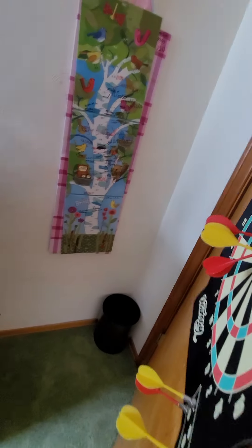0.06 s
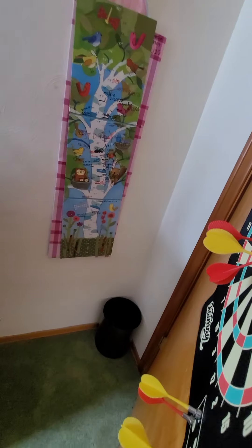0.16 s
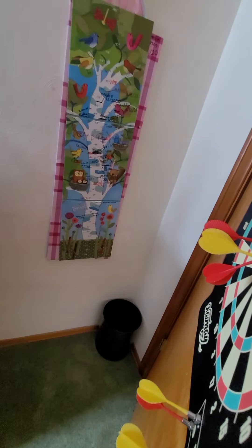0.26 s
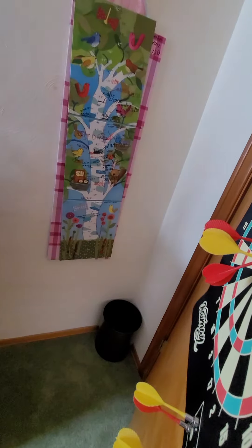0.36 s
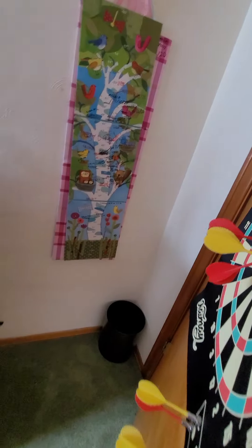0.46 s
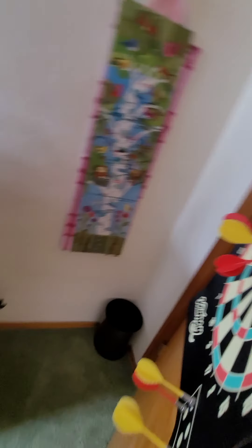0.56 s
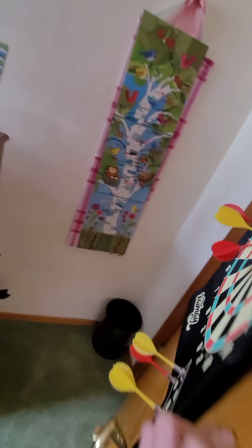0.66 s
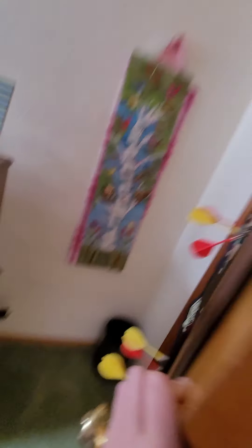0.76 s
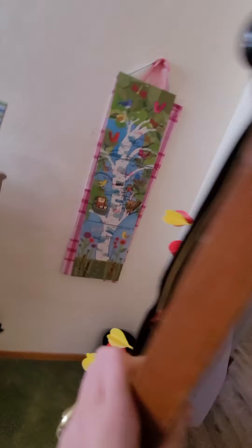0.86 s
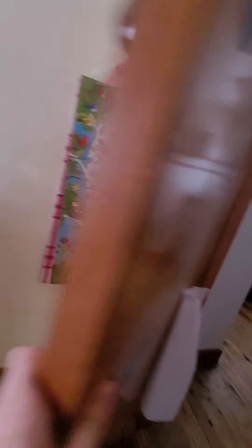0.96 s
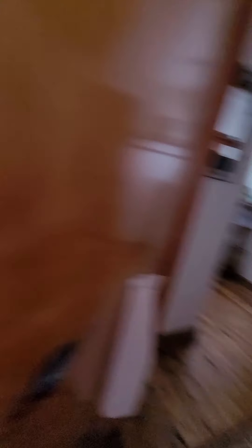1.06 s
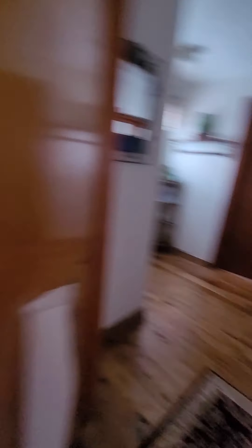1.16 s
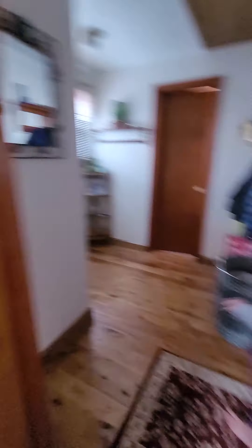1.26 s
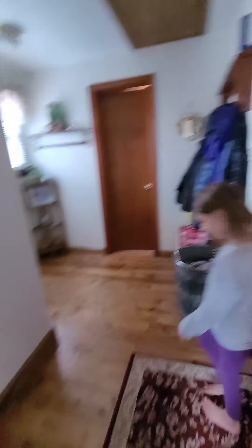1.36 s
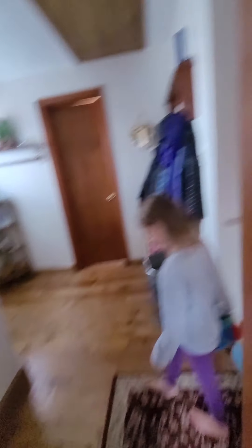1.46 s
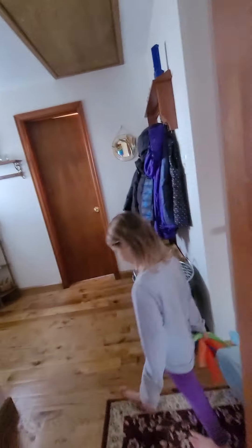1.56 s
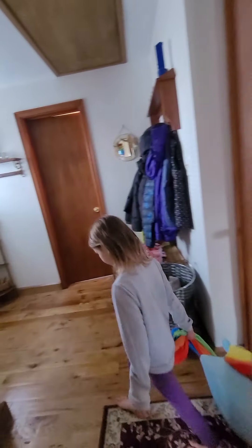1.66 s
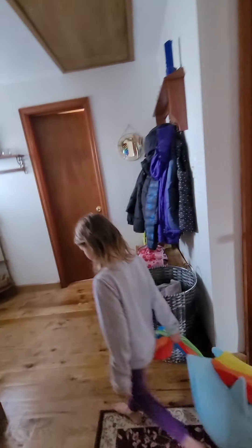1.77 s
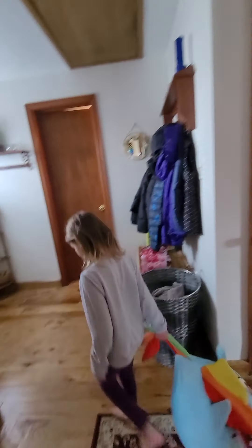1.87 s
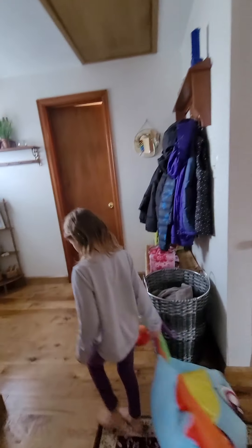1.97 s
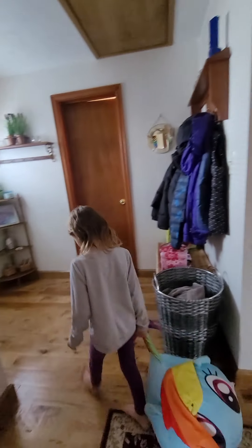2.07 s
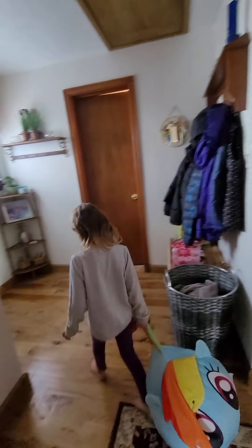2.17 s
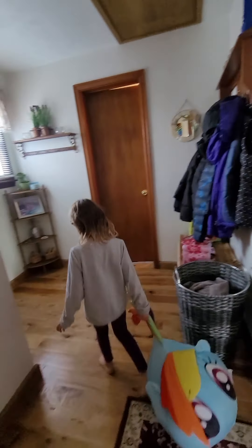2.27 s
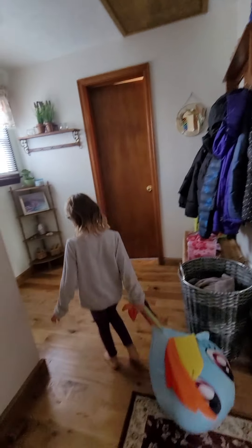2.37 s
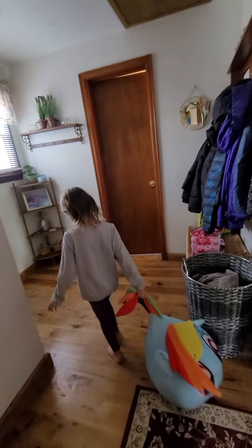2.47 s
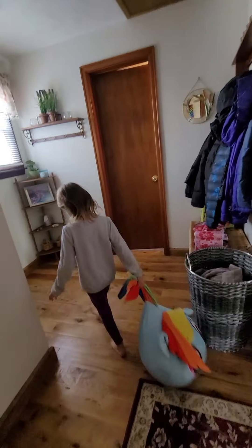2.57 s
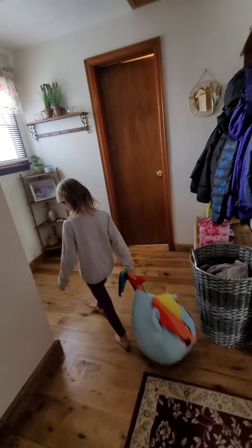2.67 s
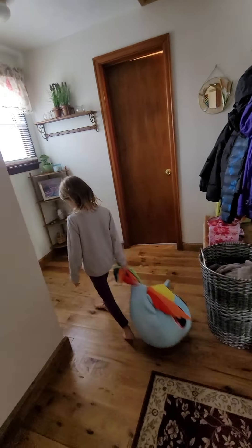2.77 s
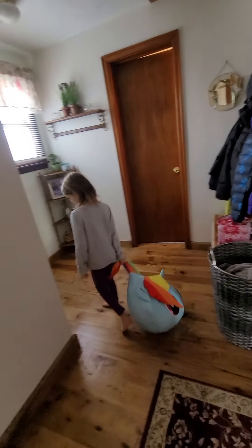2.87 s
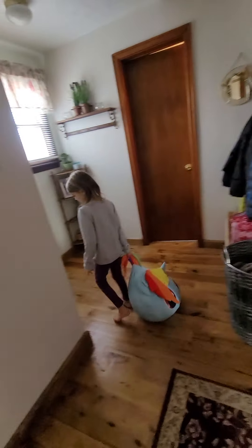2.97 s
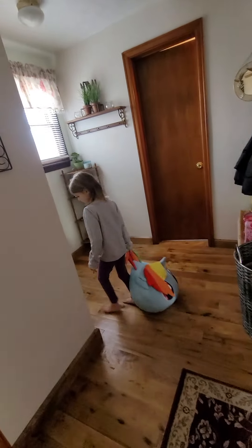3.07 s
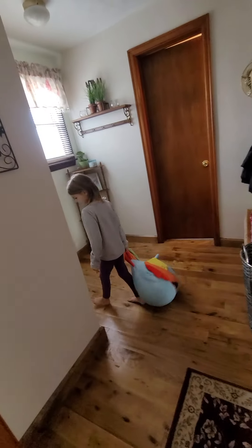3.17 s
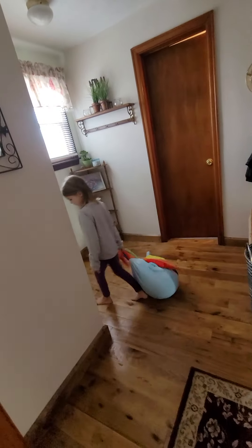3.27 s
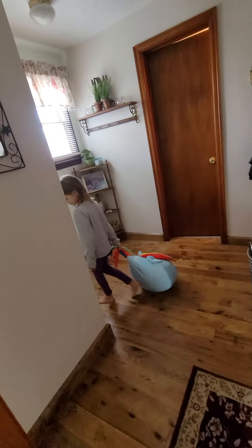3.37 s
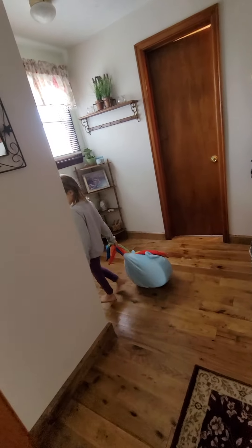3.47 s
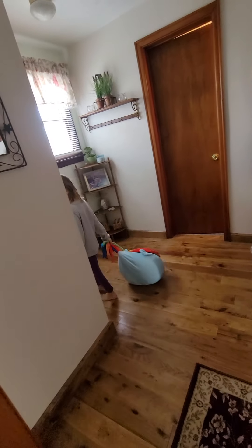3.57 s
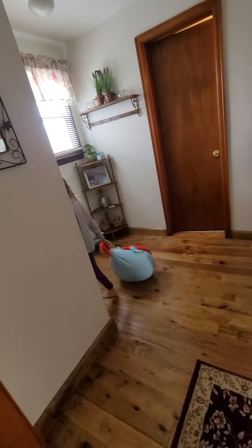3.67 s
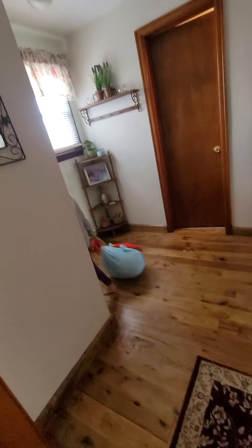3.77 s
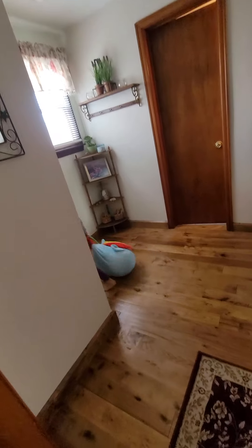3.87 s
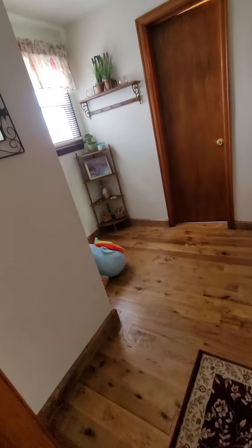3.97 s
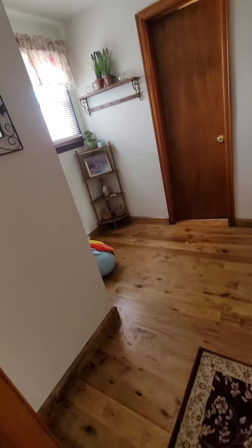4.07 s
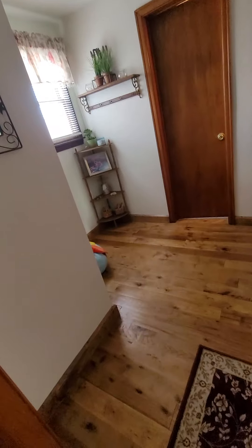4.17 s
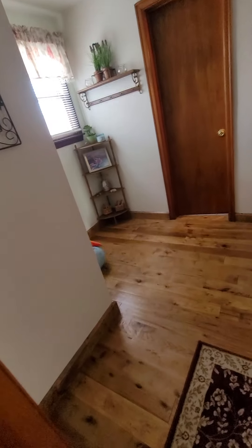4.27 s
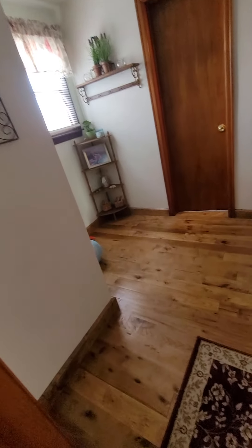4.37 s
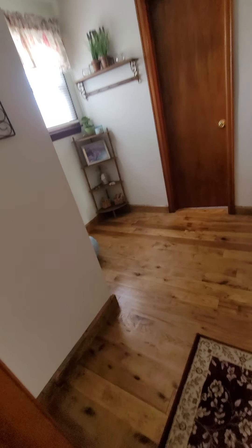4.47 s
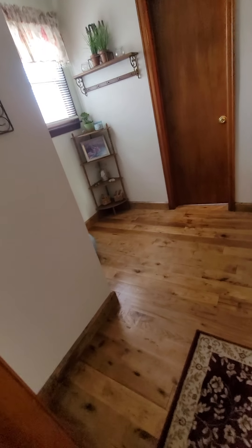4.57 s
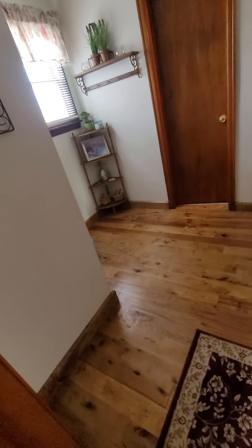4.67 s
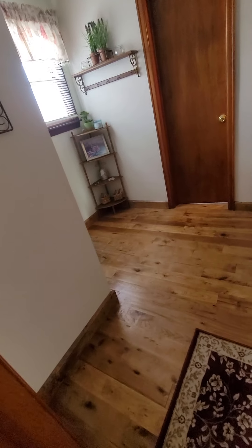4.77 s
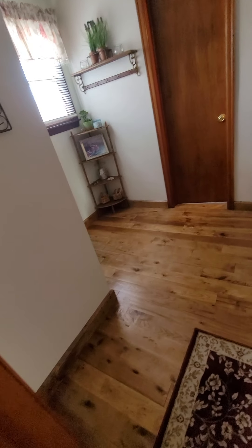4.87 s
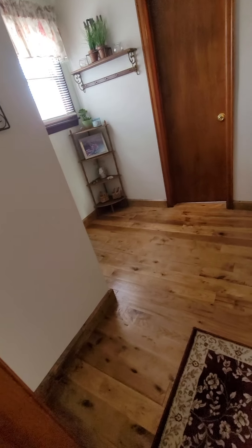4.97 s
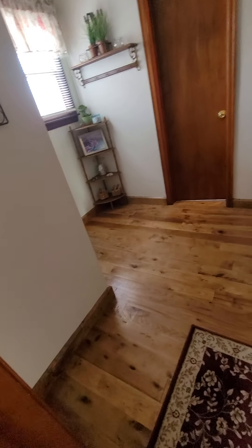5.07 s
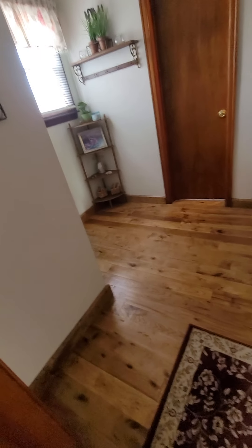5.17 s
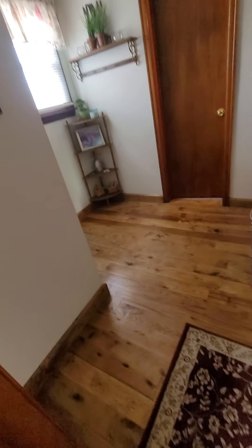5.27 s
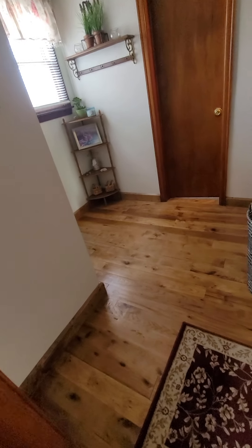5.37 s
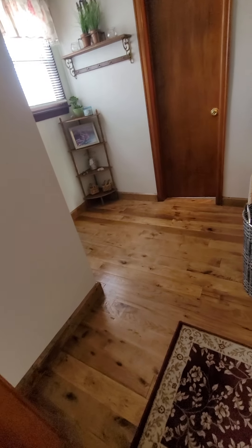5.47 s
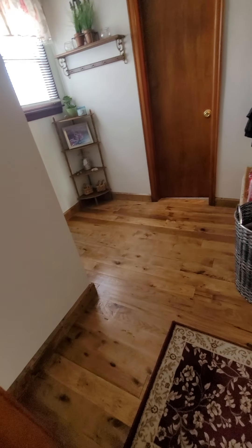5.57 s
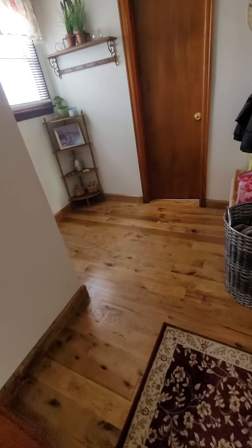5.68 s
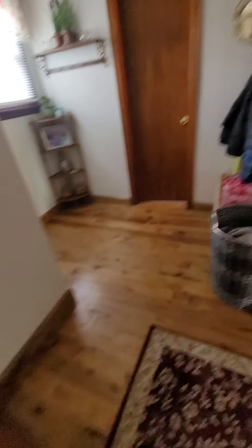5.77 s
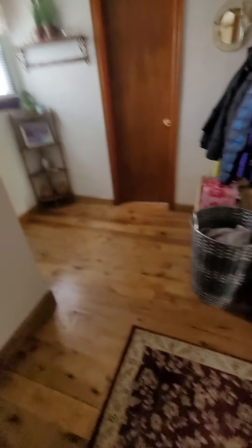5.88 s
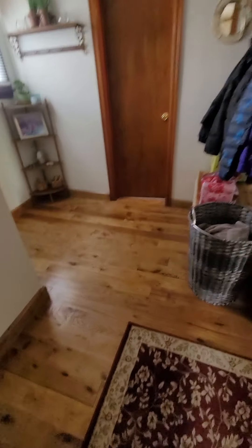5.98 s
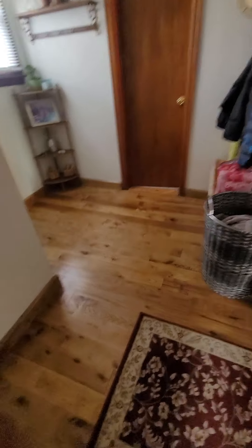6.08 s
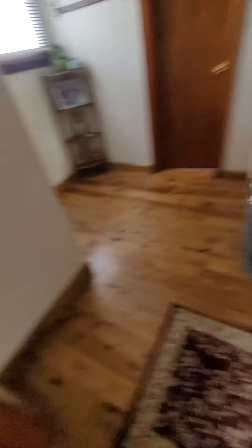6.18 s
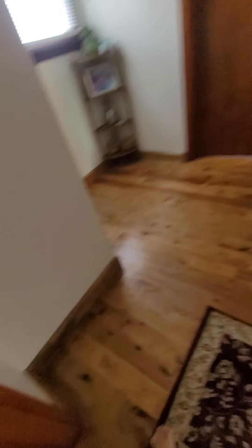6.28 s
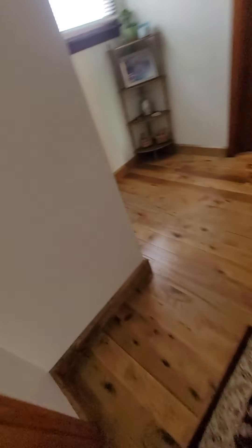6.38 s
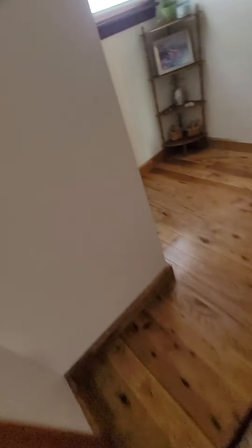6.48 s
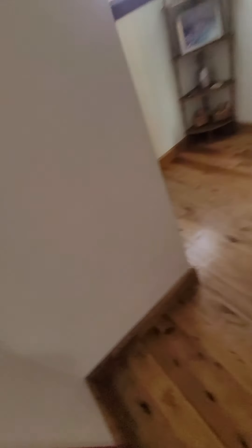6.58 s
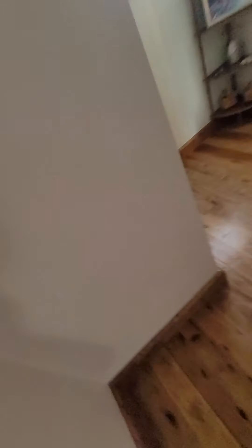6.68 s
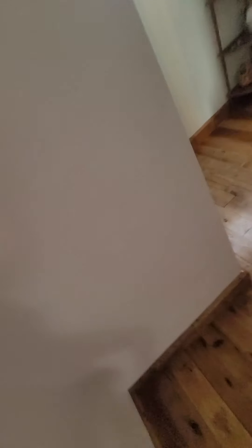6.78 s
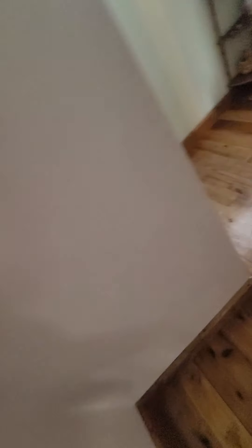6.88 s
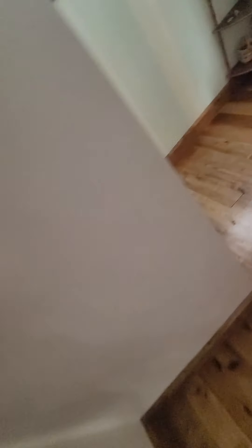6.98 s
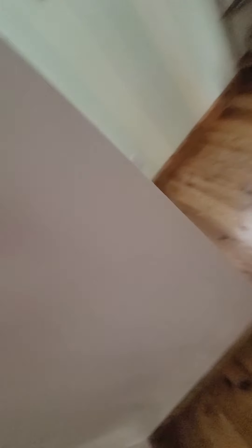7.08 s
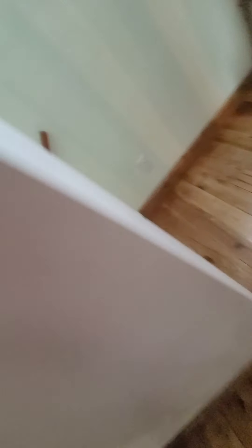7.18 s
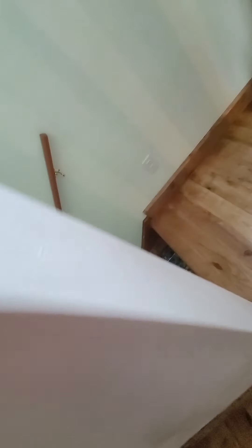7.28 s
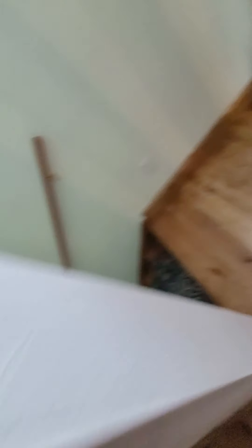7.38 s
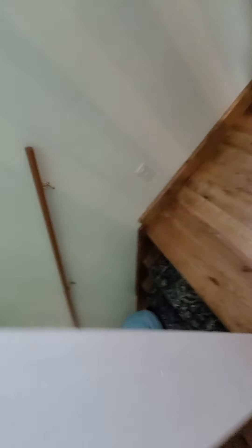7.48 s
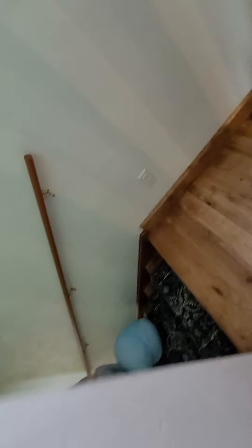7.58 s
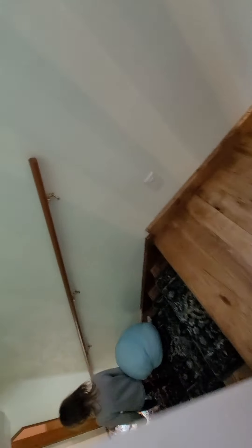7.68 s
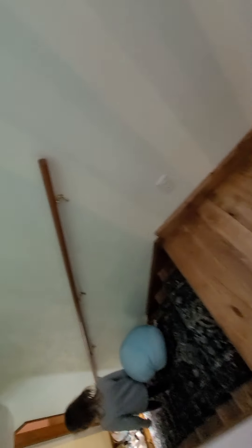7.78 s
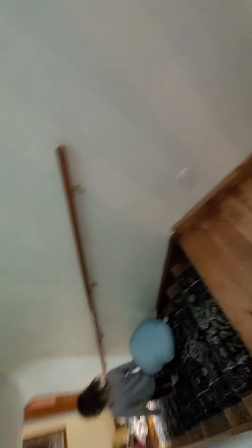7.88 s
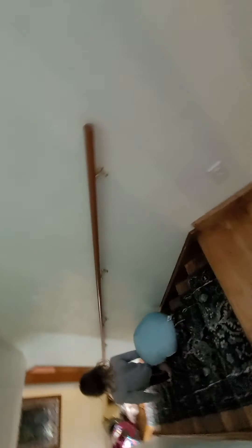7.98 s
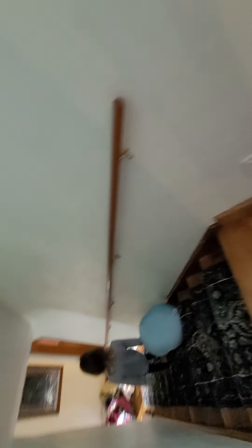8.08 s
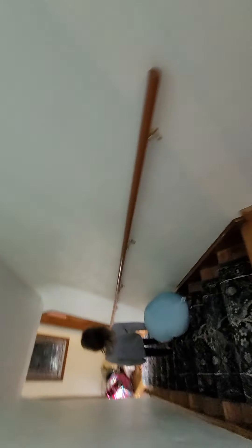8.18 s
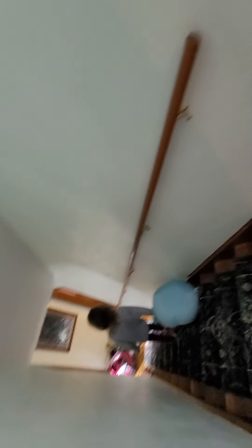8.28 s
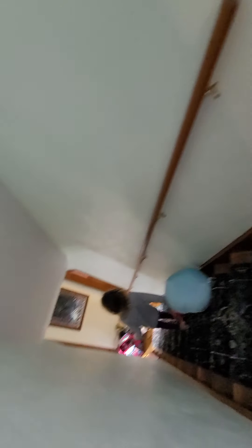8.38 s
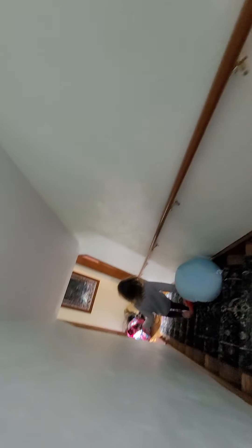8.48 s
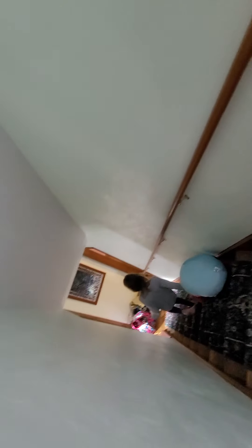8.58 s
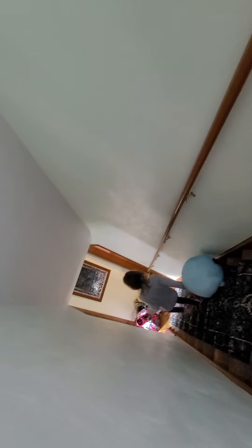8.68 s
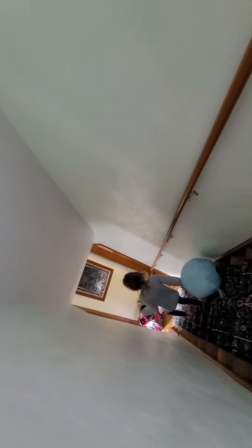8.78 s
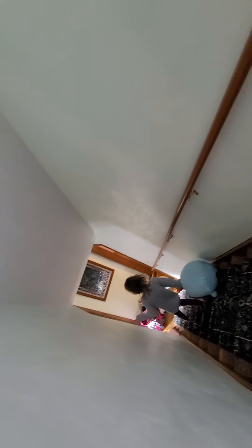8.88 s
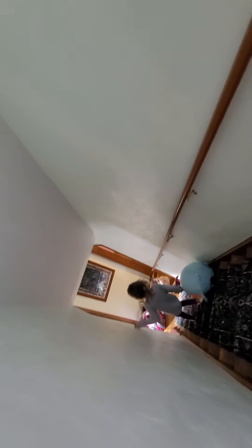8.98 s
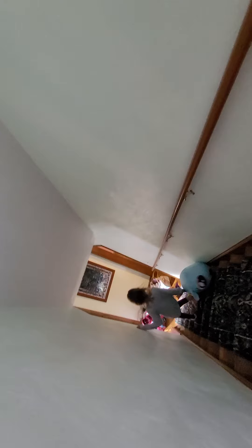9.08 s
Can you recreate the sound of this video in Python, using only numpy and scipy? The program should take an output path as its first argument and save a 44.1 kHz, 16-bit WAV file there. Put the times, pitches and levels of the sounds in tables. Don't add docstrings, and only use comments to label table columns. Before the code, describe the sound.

One loud door knock, soft barefoot thuds, faint cloth hiss, then sharp board cracks and dull uneven steps on an indoor wooden staircase.

```python
import sys
import numpy as np
from scipy import signal
from scipy.fft import rfft, irfft, next_fast_len
from scipy.io import wavfile
from scipy.ndimage import uniform_filter1d

SR = 44100
rng = np.random.default_rng(int(sys.argv[2]) if len(sys.argv) > 2 else 0)


def boost(x):
    u = np.asarray(x, float) / 20
    return 10 ** u


def output_pcm(signal):
    pcm = np.clip(np.atleast_2d(signal).T, -1, 1) * 32767
    wavfile.write(sys.argv[1], SR, np.round(pcm).astype(np.int16))


N = 403074

# t/s, bass lag/ms, treble lag/ms, bass level/dB, treble level/dB
BEARING = [(.024, -.5, -.23, 4, 2), (.35, -.48, -.29, 5, 0), (.7, .48, .45, -3, -2), (1.3, .54, .5, -1, -3),
           (2.16, .5, .39, -7, -4), (3.5, .41, .39, -7, -2), (4.1, -.11, -.02, -1, -1),
           (4.8, -.14, -.035, -3, 3), (5.13, -.18, -.035, -1.5, 4), (5.32, -.09, -.02, -3, 1),
           (5.67, -.08, .02, -1, 0), (5.86, -.09, -.02, -5, 1), (6.06, -.23, -.035, -4, 3),
           (6.43, -.05, .07, -8, -2), (6.87, .58, .2, -8.5, -3), (7.08, .6, .25, -11, -3),
           (7.5, .52, .25, -12, -5), (7.75, .6, .26, -12, -4), (7.93, .45, .25, -12, -3),
           (8.03, .2, .2, -6, -3), (8.41, .52, .2, -12, -4), (8.6, -.3, -.34, -6, 0),
           (9.1, -.42, -.3, -2, 0)]
BODY_HZ = 1502
UNSHADED_HZ = 200
TRAVEL_S = .001
# f/Hz, correlation [-1 to 1]
LIKENESS = [(60, 0.88), (130, 0.74), (290, 0.23), (640, -0.58), (1410, -0.51), (3100, 0.0079),
            (6820, -0.011), (15000, -0.27)]
# f/Hz, t60/s, level/dB
HALL_OCTAVES = [(180, 0.42, 0.5), (318, 0.25, 4.5), (692, 0.23, 4), (1415, 0.18, 7.5), (3000, 0.2, 3),
                (5930, 0.24, -1.5), (11000, 0.13, -3.5)]

# f/Hz, level/dB per Hz
RUMBLE_SPECTRUM = [(12, -56.5), (20, -19.5), (54, 0.5), (70, 4), (102, -11.5), (173, -5.5), (260, -31.5),
                   (340, -49)]
# t/s, level/dB
JOSTLE = [(0, -62), (1.9, -61.5), (2.6, -67.5), (3.7, -71.5), (5.0, -67), (7.85, -68.5), (8.4, -61),
          (9.14, -69)]
AFTERSHAKE_DB, AFTERSHAKE_T60_S = -27, 1.15
# f/Hz, level/dB per Hz
AIR_SPECTRUM = [(88, -42.5), (160, -10.5), (240, -3.5), (395, 1), (605, -3), (823, -11.5), (1280, -8),
                (5600, -30)]
# t/s, level/dB
STIR = [(0.0, -54.5), (0.43, -67), (1.45, -60.5), (2.11, -69), (2.4, -63), (3.05, -67.5), (3.8, -68.5),
        (4.07, -61.5), (4.27, -69.5), (5.78, -64.5), (6.8, -67), (7.03, -57.5), (7.59, -64.5),
        (7.89, -59.5), (8.5, -66), (9.14, -59.5)]
# f/Hz, level/dB per Hz
CLOTH_SPECTRUM = [(1470, -45.5), (2500, -7.5), (2740, -5), (2980, -11), (4010, -2.5), (7220, -6),
                  (8480, -3.5), (15500, -7)]
# t/s, length/s, end level/dB
PULLS = [(0.575, 0.57, -74.5), (1.28, 0.14, -71.5), (1.412, 0.47, -62.5), (2.566, 0.27, -71.5),
         (2.733, 0.2, -63), (2.933, 0.18, -62), (4.379, 0.4, -66.5), (6.081, 0.15, -67.5),
         (6.614, 0.3, -76), (6.864, 0.26, -70.5), (7.146, 0.48, -81), (7.73, 0.24, -69),
         (7.92, 0.13, -67.5), (8.26, 0.098, -66), (9.106, 0.056, -66.5)]
# t/s, length/s, start level/dB
BRUSHES = [(3.115, 0.4, -71), (3.532, 0.74, -69), (4.17, 0.2, -71.5), (5.684, 0.075, -72),
           (6.44, 0.12, -72), (8.105, 0.1, -61), (8.38, 0.21, -68.5), (8.602, 0.17, -68.5)]
PULL_SWELL_DB, BRUSH_FADE_DB = 5.5, 7
# t/s, rms level/dB, low f/Hz, high f/Hz, t60/s
SLAPS = [(.022, -36, 294, 1000, 0.25), (0.023, -39, 1300, 3000, 0.11), (0.674, -64.5, 586, 2600, 1),
         (0.777, -39, 445, 4770, 0.15), (1.263, -41, 785, 2390, 0.12), (1.261, -51, 3400, 4900, 0.16),
         (2.155, -53.5, 197, 1730, 0.27), (4.842, -42.5, 375, 5800, 0.14), (5.323, -49, 1940, 16000, 0.073),
         (7.084, -49.5, 496, 9000, 0.095), (7.93, -65.5, 497, 5000, 0.93), (6.864, -46, 300, 6000, .12),
         (5.655, -58, 500, 3000, .2)]
# t/s, rms level/dB, low f/Hz, high f/Hz, t60/s
SLIDES = [(1.36, -56, 290, 3030, 0.37), (2.731, -54, 283, 3520, 0.25), (3.318, -59, 300, 785, 0.19),
          (4.722, -57, 115, 260, 1.6), (6.11, -67.5, 2440, 7000, 0.4), (6.439, -65.5, 306, 6400, 0.86),
          (6.779, -58, 2020, 5970, 0.2), (6.888, -41.5, 306, 4200, 0.15), (8.595, -40.5, 246, 5500, 0.22),
          (8.89, -58.5, 203, 588, 1.1), (9.077, -36.5, 241, 340, 0.33), (6.125, -67, 5400, 6300, 0.47),
          (6.14, -66.5, 2800, 3400, 0.35), (6.45, -66, 5400, 6200, .4), (6.47, -65.5, 2820, 3400, 0.32),
          (3.86, -73, 900, 3000, 2.5), (4.06, -75, 1180, 1350, .9)]
SLAP_RISE_S, SLIDE_RISE_S = .0035, 0.016
# t/s, peak level/dB
DOOR_HIT = [
    (0.0234, -7),
]
# f/Hz, level/dB, t60/s
DOOR_MODES = [(372, -13, 0.28), (511, -19.5, 0.27), (600, -1.5, 0.3), (640, -4.5, 0.073), (953, -4, 0.096),
              (1233, -15.5, 0.15), (1850, -24, 0.096), (1900, -37, 0.12), (2530, -23.5, 0.035),
              (3050, -29, 0.32)]
# t after contact/s, strength [ratio]
DOOR_BLOWS = [(.0025, 2.1), (.0062, .9), (.0165, 0.7), (.025, 0.53), (.04, 0.43), (.049, 0.31)]
# t/s, peak level/dB, f/Hz,
# width/octaves
CLICKS = [(.175, -63, 2200, 1.5), (.197, -60, 13000, .6), (.208, -52, 2300, 1.9), (.557, -40, 13100, 0.73),
          (.557, -56, 5000, 1.6), (0.783, -43, 5000, .6), (0.788, -47, 5000, .6), (2.047, -53, 2770, 1.6),
          (4.1773, -39, 5800, 0.5), (4.191, -52, 4500, 1.8), (4.1965, -36, 11500, 0.79),
          (4.2032, -40, 8450, 0.36), (4.8018, -27, 1700, .8), (5.1277, -25, 4420, 0.83),
          (5.1274, -22, 1140, 1.03), (5.1393, -36, 1000, 0.87), (5.3208, -30, 1430, 0.64),
          (5.6662, -26, 2000, 0.46), (5.8562, -42, 1300, 0.58), (6.0566, -32.5, 1900, 0.83),
          (1.263, -44, 3770, 0.58), (.7752, -33, 2520, 0.6), (.7822, -43, 3330, 0.24),
          (7.515, -39.5, 760, 0.46), (6.4375, -42, 1220, 0.96), (3.417, -52, 2400, 0.6),
          (.0235, -44, 4490, .9), (5.128, -27, 14500, 0.4), (5.139, -40, 13100, 0.49),
          (5.3213, -22.5, 3060, 0.92), (5.321, -35, 6050, 0.18), (5.3282, -27.5, 2420, 1.4),
          (5.329, -29, 12400, .3), (5.6662, -23, 2630, 0.73), (6.0571, -27, 2420, 0.7),
          (6.574, -54, 2950, .6), (6.778, -54.5, 4090, 0.73), (6.8622, -39, 5540, 0.4),
          (6.885, -40, 5640, 0.28), (7.007, -55, 2780, 1.5), (7.5157, -39, 2300, 0.54),
          (7.543, -44, 2300, 0.44), (7.732, -48, 2870, 0.37), (7.788, -50, 2780, 0.52),
          (7.928, -45, 3120, 0.44), (8.109, -47, 10000, .9), (8.602, -48, 2570, .8),
          (4.1768, -44, 11500, .8), (4.8015, -38, 14500, .4), (4.82, -55, 13000, .4),
         (4.845, -50, 8000, 1.5), (5.267, -58, 8000, 1.5), (5.3235, -38, 13000, .2),
         (5.326, -38, 12500, .2), (5.6668, -23.5, 2400, .9), (6.575, -58, 9000, 1.5),
         (7.7606, -45, 3000, 0.44), (8.41, -46, 2600, .6), (8.41, -49, 7200, .4), (1.263, -42, 4200, 0.46),
         (4.2036, -48, 7000, 2.0), (4.1768, -52, 2500, 1.2), (8.72, -58, 11000, .9), (7.0, -58, 7000, 1.5)]
# t/s, peak level/dB, joist f/Hz, tread overtone level/dB
FLOOR_STEPS = [(0.026, -40.5, 84.7, -18), (0.259, -48.5, 84.7, -12.5), (0.42, -54, 79.8, -10.5),
               (0.674, -47, 76.3, -13), (0.768, -42.5, 61.4, -19), (0.976, -61, 129.6, 0.5),
               (1.18, -40, 69.6, -28), (1.297, -42, 65.3, -18), (1.39, -35, 54.5, -19),
               (1.602, -49.5, 69.5, -9), (2.2562, -17, 89, -19), (2.302, -34, 75, -20),
               (2.419, -54, 74, -36), (2.657, -62, 80, 5.5), (2.793, -36, 108, -14.5),
               (2.807, -29.5, 70, -38), (2.932, -49.5, 58.4, -27), (3.311, -29, 67, -37),
               (3.398, -46, 69.3, -36)]
# t/s, peak level/dB, stringer f/Hz, tread overtone level/dB
STAIR_STEPS = [(5.2, -44, 77.4, -10), (5.26, -43.5, 50.8, -4), (5.717, -32, 54, -6.5),
               (5.739, -34.5, 96.7, -14), (5.791, -33.5, 42.3, -22), (6.24, -48.5, 130.7, -2.5),
               (6.268, -40.5, 67.2, -7), (6.314, -25.5, 46, -32), (6.37, -34, 58, -26),
               (6.84, -49, 131.8, 3.5), (6.899, -29.5, 121, -7), (6.908, -15.5, 96.5, -17),
               (6.942, -24, 89.4, -18), (6.98, -28, 50.8, -35), (7.03, -37.5, 70.2, -19.5),
               (7.463, -47, 57.8, 3.5), (7.512, -29, 50.4, -5), (7.571, -35.5, 42.8, -22),
               (8.013, -42.5, 61.4, 2.5), (8.089, -39, 52.9, -14), (8.131, -48, 51.2, 0.5),
               (8.435, -48.5, 50.7, -21), (8.556, -27.5, 60, -8), (8.588, -25, 60, -11),
               (8.605, -19, 60.8, -10), (8.638, -26, 58, -4), (8.718, -34.5, 43.1, -9.5),
               (8.788, -42.5, 70.7, -25), (8.89, -48.5, 43.7, -1), (9.084, -33.5, 112.4, -2.5)]
FIRM_DB = -25
STEP_T60_S, STEP_T60_S_PER_DB = 0.21, 0.002
LOAD_S, LOAD_CYCLES = .006, .4
# t/s, level/dB, start f/Hz, end f/Hz, length/s
SQUEAKS = [(0.677, -53, 1430, 1340, 0.05), (0.678, -61, 770, 777, 0.098), (1.34, -65.5, 1900, 1810, 0.11),
           (4.834, -38, 5230, 5150, 0.003), (5.665, -22, 840, 1600, 0.0155),
           (6.594, -52.5, 1410, 1400, 0.0091), (2.297, -47, 497, 487, 0.027),
           (6.925, -36.5, 180, 170, 0.064), (0.135, -75, 3880, 4180, .125), (0.27, -77, 4400, 3800, 0.065),
           (6.866, -42.5, 195, 180, 0.028), (6.9, -26.5, 188, 164, 0.023),
           (8.574, -34.5, 196.6, 204, 0.029), (8.605, -36, 420, 422, 0.024),
           (8.625, -29.5, 125, 145, 0.032), (8.665, -45, 157, 147, .025), (7.044, -53, 1340, 1360, 0.019)]
# t/s, peak level/dB, ring f/Hz, crack level/dB, tick level/dB
HALL_KNOCKS = [(0.3455, -42, 476, -38, -43), (0.616, -51, 530, -12, -27), (0.7745, -22.5, 1300, -23, -50),
               (0.781, -23, 1300, -29, -35), (0.791, -35.5, 1740, -27, -16), (0.976, -46.5, 463, -10, -23),
               (1.2617, -24, 1080, -33, -58), (1.268, -41, 950, -23, -49), (1.389, -54, 350, -4, -9),
               (1.624, -49.5, 268, -8, -10), (1.871, -49, 351, -21, -18), (2.049, -59.5, 490, 1, -3),
               (2.155, -36.5, 330, -36, -41), (2.298, -50, 477, -32, -33), (2.379, -56, 332, -17, -6),
               (2.592, -53, 372, -5, -19), (3.417, -44.5, 489, -14.5, -41), (4.176, -55, 537, -8, -8),
               (4.191, -52, 540, -21, -20)]
# t/s, peak level/dB, ring f/Hz, crack level/dB, tick level/dB
TOP_TREADS = [(4.8007, -21.5, 480, -3, -30), (4.833, -43, 497, -9, -25), (5.127, -12, 575, -17.5, -37.5),
              (5.1336, -20, 336, -19, -40), (5.139, -19.5, 640, -23, -27), (5.264, -46, 203, -20, -35),
              (5.320, -30, 527, 0.5, -2.5), (5.324, -41, 465, 2, -2), (5.6658, -18.5, 640, -23, -29.5),
              (5.855, -35, 450, -8, -16), (6.056, -20, 500, -14.5, -29.5)]
# t/s, peak level/dB, ring f/Hz, crack level/dB
STAIR_KNOCKS = [(6.4332, -44, 700, 6), (6.4362, -43, 700, 8), (6.4378, -39, 520, -6), (6.596, -55, 330, -3),
                (6.8616, -21, 585, -17), (6.8845, -23, 560, -12), (7.047, -48, 1370, -9),
                (7.081, -40, 700, 4), (7.514, -36, 268, -4), (7.526, -33.5, 263, -26),
                (7.544, -52, 243, -4), (7.73, -32, 384, -10.5), (7.739, -29, 283, -24),
                (7.76, -39, 407, -1), (7.926, -41, 600, -1.5), (7.934, -42, 820, -13),
                (8.01, -44.5, 245, -12), (8.409, -38.5, 511, -7.5), (8.553, -45.5, 397, -26),
                (8.892, -43, 272, -35), (9.084, -45, 270, -32)]
TREAD_TICK_DB, TICK_FOLLOWS = -12, 0.63
FIRM_ROOM_DB, ROOM_PER_DB = -11, 0.4925
CARPET_DB = 3
CRACK_HZ, TICK_HZ = (950, 5370), (5400, 18100)
NOSING_HZ, NOSING_SHARE = (2300, 3550), 0.98
SNAP_OVER_GRIT, CRACK_WET, SWING_RISE_CYCLES = 10.3, 0.8, 0.47
# f/Hz, level/dB per Hz
HISS_SPECTRUM = [(1470, -33), (2500, -1), (3000, -7), (3270, -8.5), (4270, -9), (5490, -20.5), (9370, -12),
                 (15500, -24.5)]
HISS_DB, TOP_HZ = -76.5, 15800


def rms_one(x):
    return x / np.sqrt(np.mean(x ** 2) + 1e-20)


def at_hz(points, hz):
    table_hz, values = np.array(points)[:, :2].T
    return np.interp(np.log(hz), np.log(table_hz), values)


def in_time(rows):
    s, *columns = np.transpose(rows)
    return [np.interp(np.arange(N) / SR, s, c) for c in columns]


def band(x, low_hz, high_hz):
    sos = signal.butter(2, [low_hz, min(high_hz, SR * .45)], "band", fs=SR, output="sos")
    return signal.sosfilt(sos, x)


def fade(t, t60):
    return boost(-60 * t / max(t60, .002))


def drift(rate):
    r = np.exp(-80 * np.pi * rate / SR)
    white = rng.standard_normal(N // 40 + 2002)
    slow = signal.lfilter([1], [1, -2 * r, r * r], white)[2000:]
    return np.interp(np.arange(N) / 40, np.arange(len(slow)), rms_one(slow))


def add(out, s, sound):
    i = round((s - TRAVEL_S) * SR)
    out[:, i:i + sound.shape[1]] += sound[:, :N - i]


def ports(x, s, share=1):
    times, *columns = np.transpose(BEARING)
    bass_ms, treble_ms, bass_db, treble_db = (np.interp(s, times, c) for c in columns)
    size = next_fast_len(len(x) + SR // 100)
    hz = np.arange(size // 2 + 1) * SR / size
    bass = 1 / (1 + (hz / BODY_HZ) ** 4)
    lag_s = share * (treble_ms + (bass_ms - treble_ms) * bass) / 1000
    shadow = hz ** 2 / (hz ** 2 + UNSHADED_HZ ** 2)
    pan_db = (treble_db + (bass_db - treble_db) * bass) * shadow
    side = np.array([[1], [-1]])
    delay_s = TRAVEL_S + np.maximum(side * lag_s, 0)
    path = boost(side * pan_db / 2) * np.exp(-2j * np.pi * hz * delay_s)
    return irfft(rfft(x, size) * path, size)[:, :len(x)]


def hall_reply():
    t = np.arange(SR // 2) / SR
    white = rng.standard_normal((2, len(t)))
    reply = 0
    for hz, t60, level_db in HALL_OCTAVES:
        octave = band(white, hz / np.sqrt(2), hz * np.sqrt(2))
        reply = reply + boost(level_db) * octave * fade(t, t60)
    reply = reply * (1 - fade(t, 0.0061))
    return reply[:, :SR // 4] / np.sqrt(np.sum(reply ** 2) / 2)


def in_hall(x, s, room_db, reply):
    wet = boost(room_db) * signal.oaconvolve(x[None], reply, axes=1)
    wet[:, :len(x)] += ports(x, s)
    return wet


def bed(spectrum, patchy_db, rate):
    out, white = 0, rng.standard_normal((2, 2, N))
    lowest, highest = spectrum[0][0], spectrum[-1][0]
    edges = lowest * 2 ** np.arange(0, np.log2(highest / lowest) + .5, .5)
    for k, (low, high) in enumerate(zip(edges, edges[1:])):
        mid, side = band(white[k % 2], low, high)
        hz = np.sqrt(low * high)
        alike = np.clip(at_hz(LIKENESS, hz), -1, 1)
        gain = boost(at_hz(spectrum, hz) + patchy_db * drift(rate))
        mid = gain * np.sqrt(1 + alike) * mid
        side = gain * np.sqrt(1 - alike) * side
        out = out + np.array([mid + side, mid - side])
    return rms_one(out)


def handling_rumble():
    s, peak_db, *_ = np.transpose(FLOOR_STEPS + STAIR_STEPS)
    kicks = np.full(N, 1e-18)
    kicks[(s * SR).astype(int)] = boost(peak_db + AFTERSHAKE_DB) ** 2
    shake = signal.lfilter([1], [1, -fade(2 / SR, AFTERSHAKE_T60_S)], kicks)
    jostle_db, = in_time(JOSTLE)
    level = np.sqrt(boost(jostle_db) ** 2 + uniform_filter1d(shake, size=SR // 10))
    return level * bed(RUMBLE_SPECTRUM, patchy_db=3.5, rate=3.3)


def house_air():
    stir_db, = in_time(STIR)
    return boost(stir_db) * bed(AIR_SPECTRUM, patchy_db=3.0, rate=6.1)


def drag():
    t = np.arange(N) / SR
    pressure = np.full(N, boost(-81.5))
    strokes = [(s, length, db - PULL_SWELL_DB, db) for s, length, db in PULLS]
    strokes += [(s, length, db, db - BRUSH_FADE_DB) for s, length, db in BRUSHES]
    for s, length, start_db, end_db in strokes:
        on = slice(round(s * SR), round((s + length) * SR))
        pressure[on] += boost(start_db + (end_db - start_db) * (t[on] - s) / length)
    pressure = uniform_filter1d(pressure, size=SR // 30)
    catching = boost(1.5 + 1.1 * drift(19))
    return pressure * catching * bed(CLOTH_SPECTRUM, patchy_db=1.4, rate=8.1)


def scuffs():
    out = np.zeros((2, N))
    rows = [(*row, SLAP_RISE_S) for row in SLAPS] + [(*row, SLIDE_RISE_S) for row in SLIDES]
    white = rng.standard_normal((len(rows), 4, SR // 2))
    for (s, level_db, low_hz, high_hz, t60, rise), noise in zip(rows, white):
        t = np.arange(min(round(.8 * t60 * SR), SR // 2)) / SR
        noise = noise[:, :len(t)]
        grains = boost(2.4 * rms_one(band(noise[3], 30, 280)))
        dull = np.exp(-2 * np.pi * 1.5 * low_hz / SR)
        rub = signal.lfilter([1], [1, -dull], noise[:3] * grains)
        rub = band(band(rub, low_hz, high_hz), low_hz / 2, high_hz)
        direct, *diffuse = rms_one(rub)
        stroke = boost(level_db) * (1 - np.exp(-t / max(rise, .001))) * fade(t, t60)
        add(out, s, stroke * (1.1 * ports(direct, s) + 1.56 * np.array(diffuse)))
    return out


def door(reply):
    (s, peak_db), t = DOOR_HIT[0], np.arange(SR // 3) / SR
    panel = 0
    for hz, level_db, t60 in DOOR_MODES:
        panel = panel + boost(level_db) * np.sin(2 * np.pi * hz * t) * fade(t, .22 * t60)
    rattle = .55 * rng.standard_normal(len(t)) * fade(t, 0.11) * (1 - fade(t, 0.0047))
    for after, force in DOOR_BLOWS:
        rattle += force * np.exp(-((t - after) / 0.00013) ** 2)
    blow = band(signal.fftconvolve(panel, rattle)[:len(t)], 380, 2900)
    blow = boost(peak_db - 4.0) * blow / np.abs(blow).max()
    out = np.zeros((2, N))
    add(out, s - .0012, in_hall(blow, s, -12.5, reply))
    return out


def clicks(reply):
    out, t = np.zeros((2, N)), np.arange(SR // 100) / SR
    rows = CLICKS
    slips = rng.standard_normal((len(rows), len(t))) * fade(t, 0.0064) + 7.2 * (t == 0)
    for (s, peak_db, hz, octaves), slip in zip(rows, slips):
        half = 2 ** (max(octaves, .1) / 2)
        click = band(slip, min(hz / half, .4 * SR), hz * half)
        click = boost(peak_db) * click / np.abs(click).max()
        add(out, s, in_hall(click, s, -17.0, reply[:, :SR // 8]))
    return out


def thumps():
    out, t = np.zeros((2, N)), np.arange(SR // 2) / SR
    steps = FLOOR_STEPS + STAIR_STEPS
    grain = band(rng.standard_normal((len(steps), len(t))), 98, 245)
    for (s, peak_db, hz, tread_db), rough in zip(steps, grain):
        t60 = STEP_T60_S + STEP_T60_S_PER_DB * (FIRM_DB - peak_db)
        load = 1 - np.exp(-(t / (LOAD_S + LOAD_CYCLES / hz)) ** 2)
        phase = 2 * np.pi * hz * (t + 0.0031 * (1 - np.exp(-t / 0.022)))
        swing = (np.sin(phase) + 0.48 * np.sin(0.682 * phase)) * fade(t, t60)
        tread = boost(tread_db + 2.5) * rms_one(rough) * fade(t, 0.46 * t60)
        thump = boost(peak_db + 3.5) * load * (swing + tread)
        add(out, s, ports(thump, s, share=0.86))
    return out


def squeaks(reply):
    out, waver = np.zeros((2, N)), drift(40)
    for s, level_db, start_hz, end_hz, length in SQUEAKS:
        t = np.arange(round(length * SR)) / SR
        cycles = start_hz * t + (end_hz - start_hz) * t ** 2 / (2 * length)
        level = boost(level_db + 1.5 * waver[round(s * SR):][:len(t)])
        stroke = np.sin(np.pi * t / length) ** 0.66 * level
        add(out, s, in_hall(np.sin(2 * np.pi * cycles) * stroke, s, -20.0, reply))
    return out


def knocks(replies):
    out, t = np.zeros((2, N)), np.arange(SR // 16) / SR
    rows = HALL_KNOCKS + TOP_TREADS
    rows = rows + [(*row, TREAD_TICK_DB + TICK_FOLLOWS * row[-1]) for row in STAIR_KNOCKS]
    grit = rng.standard_normal((len(rows), len(t)))
    snap = SNAP_OVER_GRIT * (t == 0)
    cracks = band(snap + grit * fade(t, 0.015), *CRACK_HZ)
    cracks = cracks + NOSING_SHARE * band(cracks, *NOSING_HZ)
    ticks = band(0.32 * snap + grit * fade(t, 0.0081), *TICK_HZ)
    for k, (s, peak_db, hz, crack_db, tick_db) in enumerate(rows):
        room_db = FIRM_ROOM_DB + ROOM_PER_DB * (FIRM_DB - peak_db)
        if k >= len(HALL_KNOCKS):
            room_db -= CARPET_DB
        swing = np.sin(2 * np.pi * hz * t) * fade(t, 5.5 / hz)
        swing *= 1 - np.exp(-(t * hz / SWING_RISE_CYCLES) ** 2)
        overtone = 0.22 * np.sin(2 * np.pi * 2.11 * hz * t) * fade(t, 2.18 / hz)
        ring = band(overtone - swing, 0.31 * hz, 14000)
        ring /= np.abs(ring).max()
        crack = boost(crack_db + 5.0) * cracks[k] / np.abs(cracks[k]).max()
        tick = boost(tick_db + 7.0) * ticks[k] / np.abs(ticks[k]).max()
        roomy = boost(peak_db + .5) * (ring + CRACK_WET * crack + 0.22 * tick)
        close = boost(peak_db + 3.0) * (tick + (1 - CRACK_WET) * crack)
        add(out, s + .0009, in_hall(roomy, s, room_db, replies[k % len(replies)]))
        add(out, s + .0009, ports(close, s))
    return out


def scene():
    replies = [hall_reply() for _ in range(7)]
    beds = handling_rumble() + house_air() + drag()
    hits = scuffs() + door(replies[0]) + clicks(replies[2]) + thumps()
    return beds + hits + squeaks(replies[1]) + knocks(replies)


def low_pass(x):
    return signal.sosfilt(signal.butter(12, 16990, fs=SR, output="sos"), x)


def record(dry):
    noisy = dry + boost(HISS_DB) * bed(HISS_SPECTRUM, patchy_db=2.2, rate=17)
    top_cut = signal.ellip(7, .5, 28, TOP_HZ, fs=SR, output="sos")
    mix = signal.sosfilt(top_cut, noisy)
    return low_pass(mix)


dry = scene()
out = record(dry)
output_pcm(out)
```